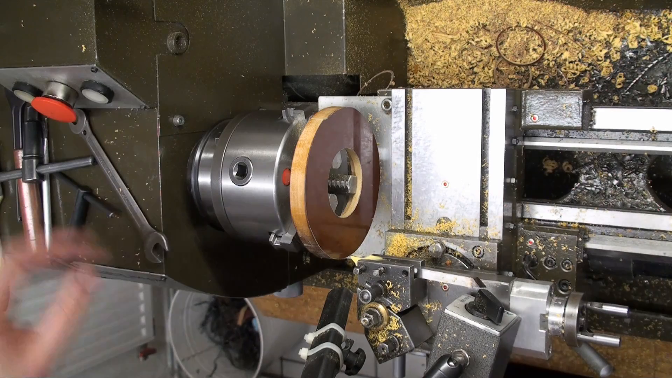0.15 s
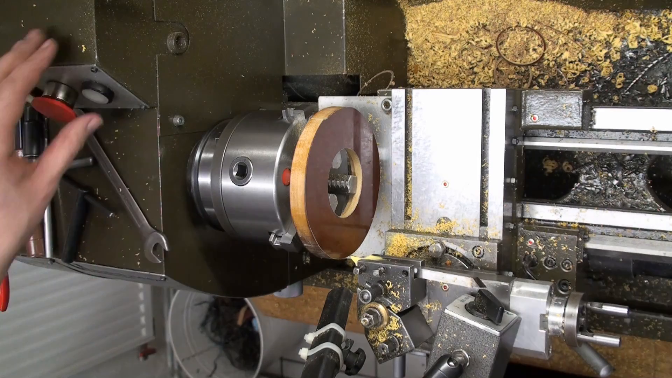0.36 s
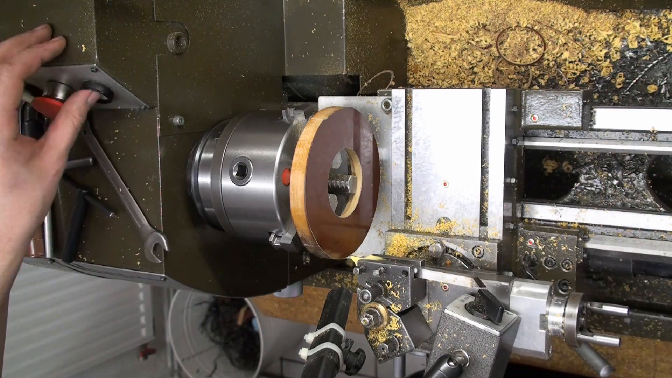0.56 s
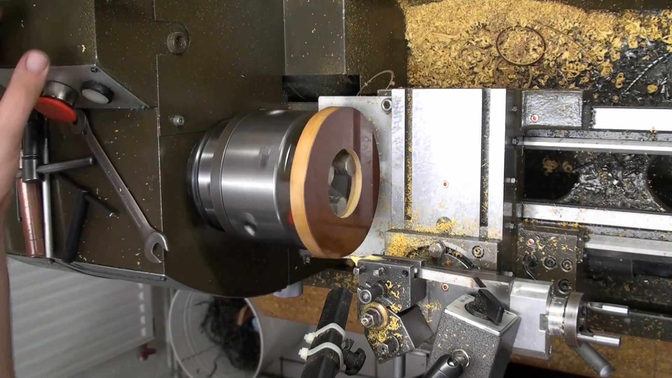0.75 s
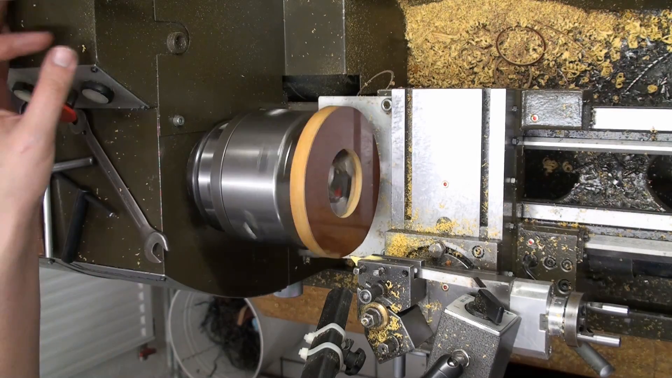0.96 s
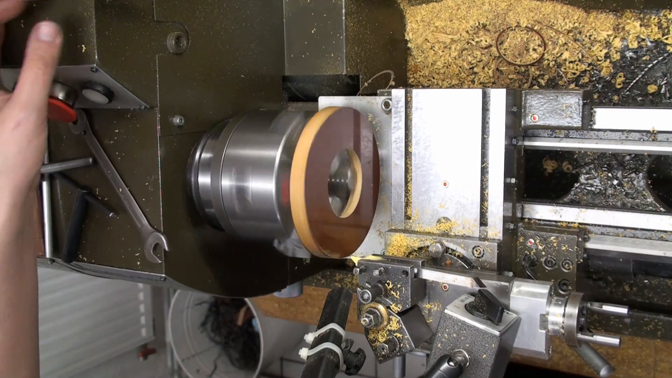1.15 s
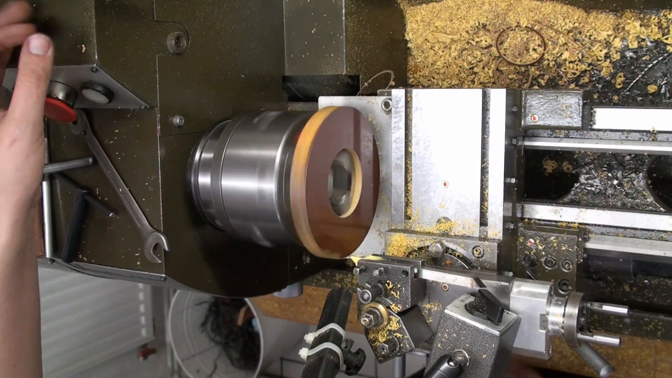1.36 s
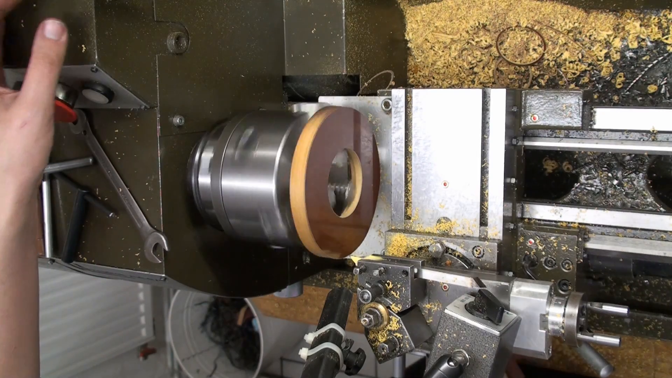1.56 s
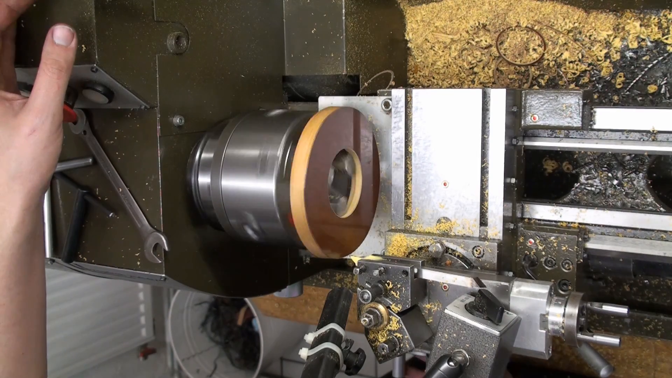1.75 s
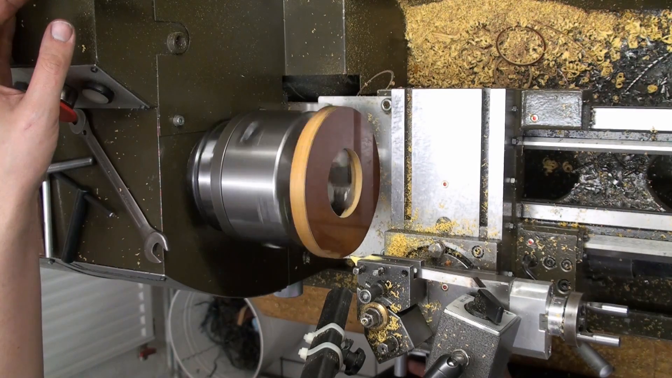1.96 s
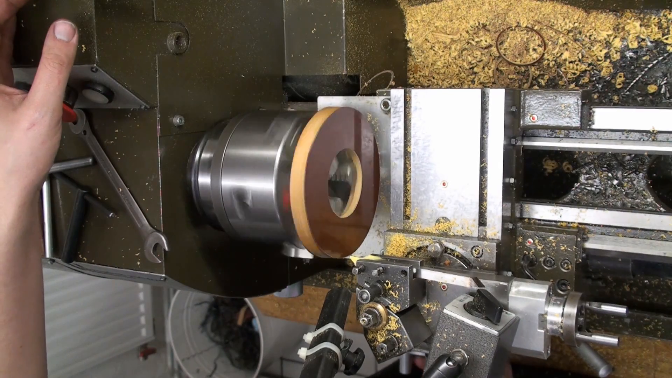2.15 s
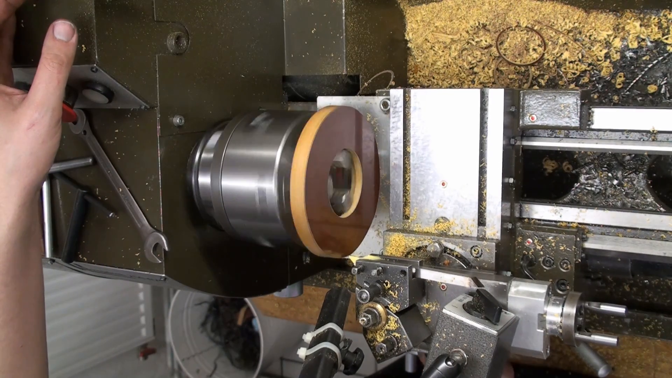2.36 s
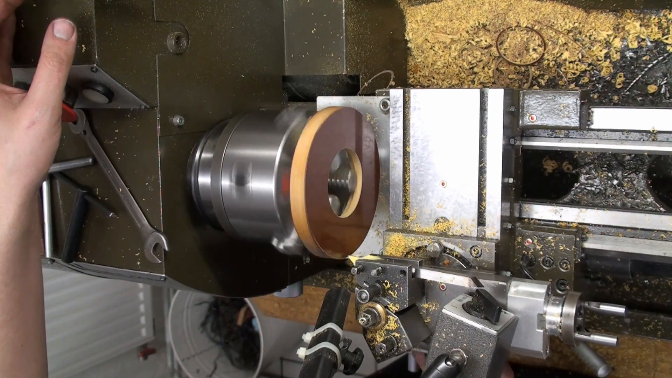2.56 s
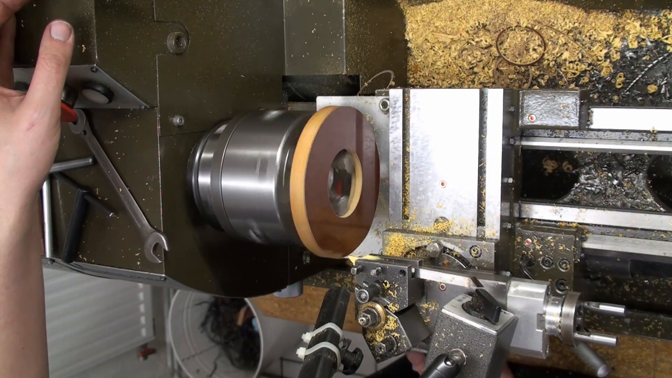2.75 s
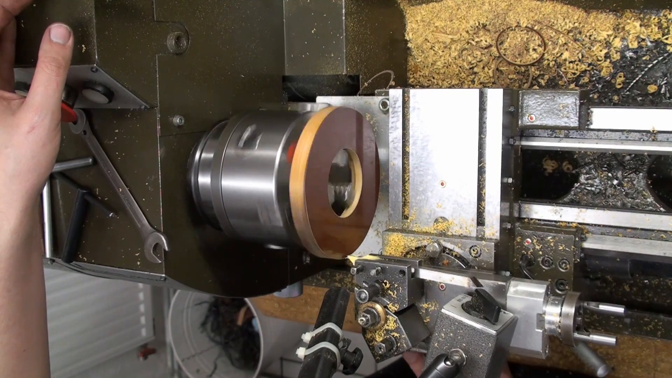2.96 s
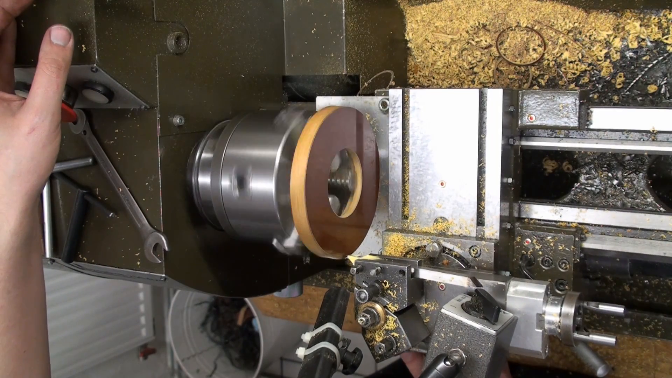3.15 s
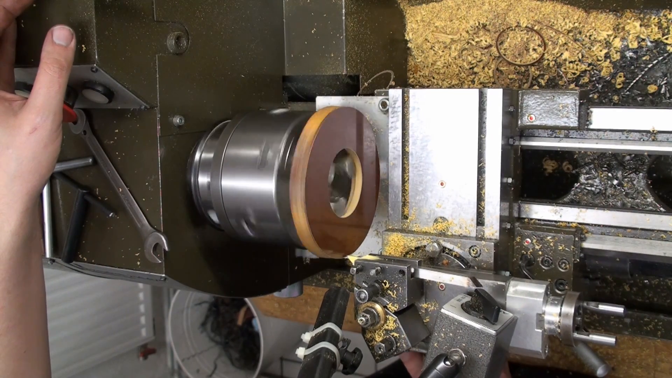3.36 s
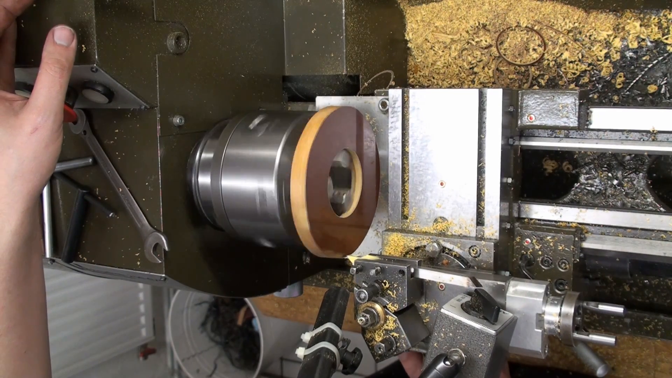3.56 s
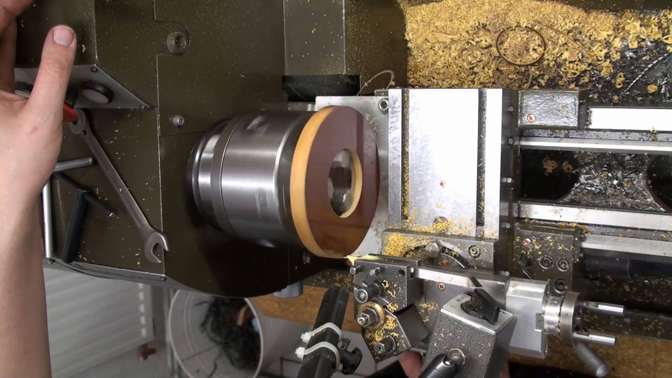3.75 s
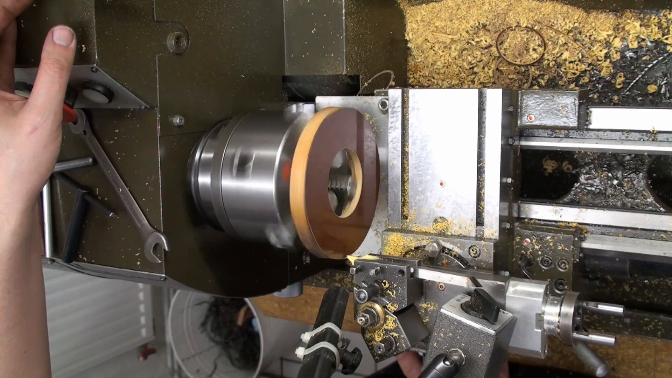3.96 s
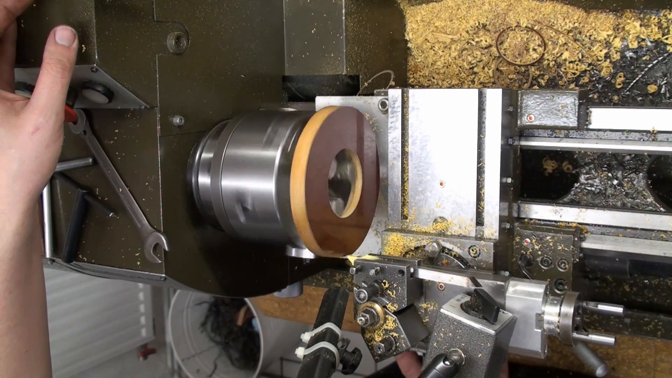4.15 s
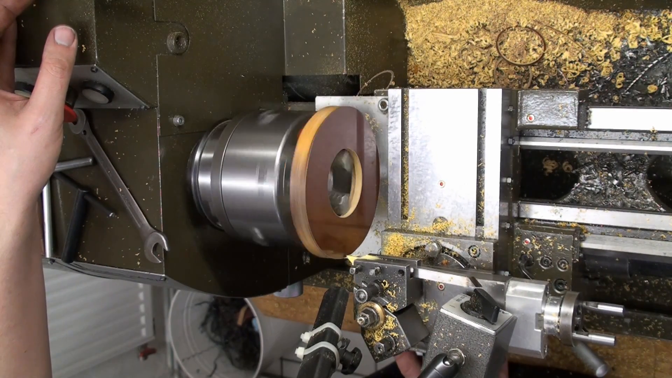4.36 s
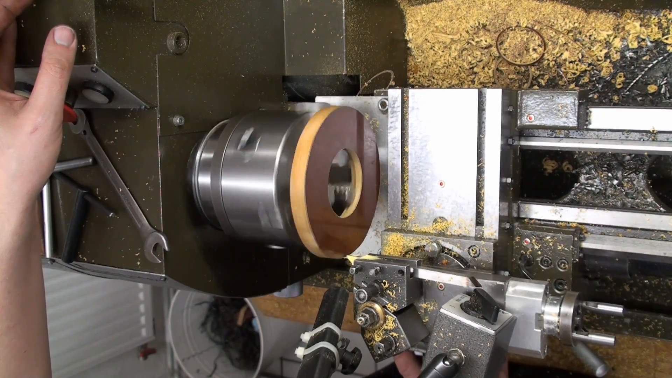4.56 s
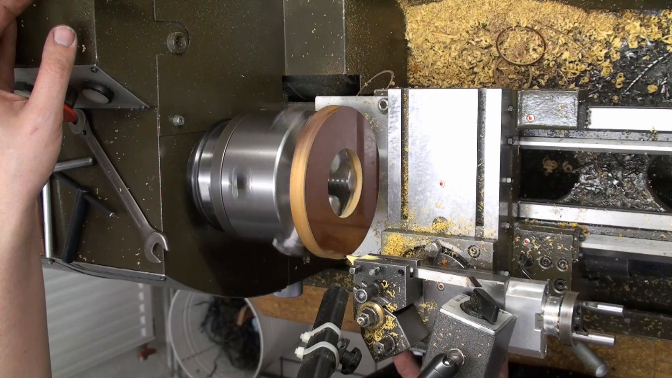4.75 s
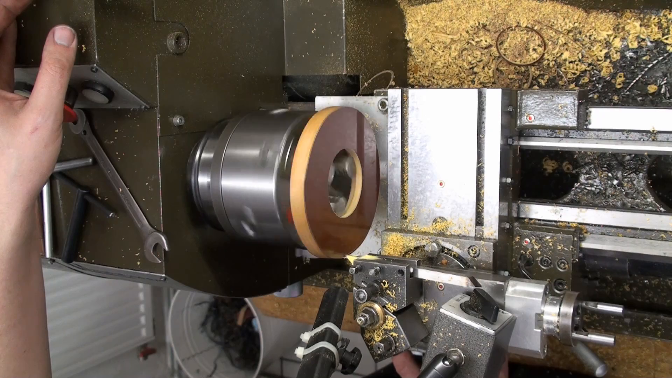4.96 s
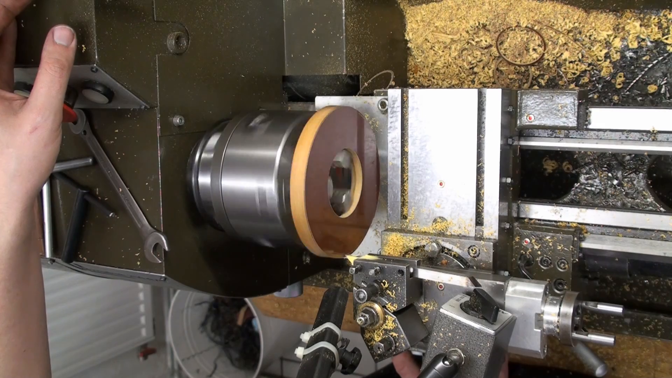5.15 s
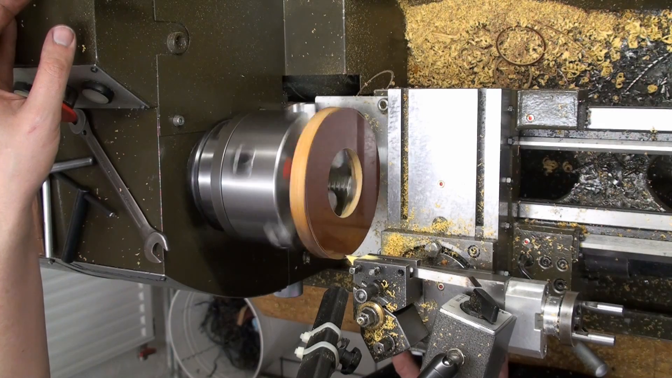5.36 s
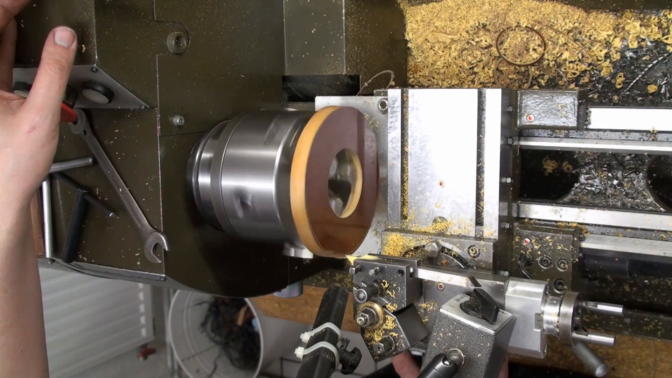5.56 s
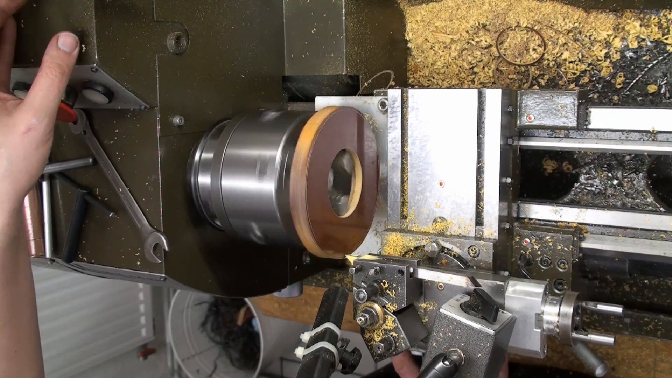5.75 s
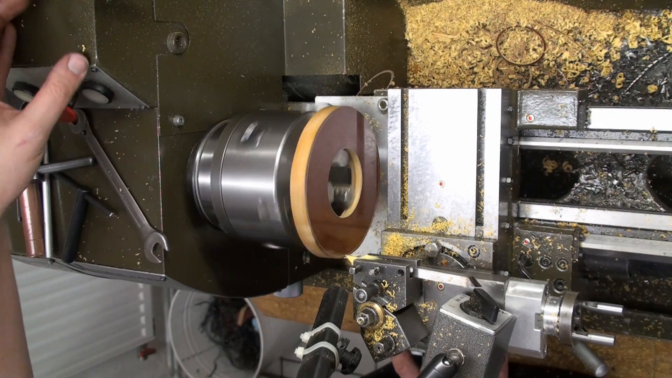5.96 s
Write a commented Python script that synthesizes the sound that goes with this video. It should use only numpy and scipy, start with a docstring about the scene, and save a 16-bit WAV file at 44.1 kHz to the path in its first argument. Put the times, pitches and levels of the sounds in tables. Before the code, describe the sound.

A small metal lathe clacks on, whines up with a knock and clinking steel, settles into a rumble, then a tool makes four harsh scrapes.

```python
"""An inverter-driven metal lathe, heard from just above the chuck in a small workshop.
At first a fan blows, as coloured noise, under faint steady tones, and the controls and gear train clack.
The drive comes on at 0.64 s and whines; the spindle overshoots with a knock, as noise rings the gears,
loose steel clinks, and all settles to a slow rumble of noise through the casting, with a deep drone.
From 5 s a tool bites a phenolic blank in four scrapes: brittle chips snap off and ring tool and post."""
import sys
import numpy as np
from scipy import signal
from scipy.fft import rfft, irfft, next_fast_len
from scipy.io import wavfile
from scipy.ndimage import uniform_filter1d

SR = 44100
rng = np.random.default_rng(int(sys.argv[2]) if len(sys.argv) > 2 else 0)


def store_wav(level_fs):
    """Save 16-bit WAV to argv[1]."""
    pcm = np.round(np.clip(np.atleast_2d(level_fs), -1, 1) * 32767)
    wavfile.write(sys.argv[1], SR, pcm.T.astype(np.int16))


N = 268613
TIME = np.arange(N) / SR
TOP_HZ = 15600
DRIVE_ON_S = 0.64

# How fast the motor's magnetic field rotates. Each row: time in seconds, field rate in Hz.
FIELD_SPEED = [(0.6, 2), (0.85, 6), (1.0, 9), (1.1, 11), (1.25, 15), (1.45, 16.5), (1.65, 14), (1.8, 11.7),
               (1.95, 10.6), (2.2, 10.1)]
# Pushes of the tool into the blank. Each row: start in seconds, end in seconds, bite time in seconds,
# drive of the edge in dB, drive of the tool post in dB, graze afterwards in dB relative to the edge.
SCRAPES = [(4.993, 5.088, 0.019, -20, -32.5, -5), (5.174, 5.269, 0.018, -18, -31, -11),
           (5.425, 5.773, 0.015, -19.5, -32.5, -8.5), (5.877, 6.058, 0.011, -21, -30.5, -10)]


def undb(db):
    """Decibels to gain."""
    return 10 ** (np.asarray(db) / 20)


def unit(x):
    """Scale to rms 1."""
    return x / np.sqrt(np.mean(x ** 2))


def curve(rows):
    """Points of (s, value), joined by straight lines in time."""
    rows = np.asarray(rows, float)
    return np.interp(TIME, rows[:, 0], rows[:, 1])


def noise():
    """White noise."""
    return rng.standard_normal(N)


def walk(rate):
    """Smooth random drift with rms 1, heading for a new value rate times a second."""
    hold = max(int(SR / rate), 1)
    steps = np.repeat(rng.standard_normal(N // hold + 1), hold)
    return unit(uniform_filter1d(steps, hold)[:N])


def envelope(start, end, attack_s, release_db_per_s):
    """Rise from start towards 1, then fade from end on."""
    rise = 1 - np.exp(-np.maximum(TIME - start, 0) / attack_s)
    return rise * undb(-release_db_per_s * np.maximum(TIME - end, 0))


def shaped(x, response):
    """Pass x through a response given as a function of frequency."""
    size = next_fast_len(N + SR // 2, True)
    hz = np.maximum(np.arange(size // 2 + 1) * SR / size, 1)
    return irfft(rfft(x, size) * response(hz), size)[..., :N]


def colour(x, points):
    """Give x a smooth spectrum of (Hz, dB) points; rms 1."""
    at, db = np.transpose(points)
    return unit(shaped(x, lambda hz: undb(np.interp(np.log(hz), np.log(at), db))))


def ring(x, modes):
    """Let x drive damped (Hz, width, dB) modes, neighbours swinging in opposite senses; rms 1."""
    def response(hz):
        total = 0
        for k, (f, width, db) in enumerate(modes):
            resonance = 1 / (1 + 1j * (hz * hz - f * f) / (hz * width))
            total = total + (-1) ** k * undb(db) * resonance
        return total

    return unit(shaped(x, response))


def workshop(x, t60, wet_db, column):
    """Near walls answer with a short noise tail, whose width between left and right varies with pitch."""
    # Stereo width of the room. Each row: frequency in Hz, side gain in dB for the machine,
    # side gain in dB for the cut.
    spread = np.transpose([(60, -28, -22), (250, -22, -12), (714, -11.5, -12.5), (1560, -7.5, -16),
                           (3040, -9.5, -16), (6940, -15, -16), (8000, -10, -11), (10500, -2, -8),
                           (11300, -3, -9), (12000, -31, -43)])
    age = TIME[:SR // 2]
    # the first reflection needs 3 ms
    tails = rng.standard_normal((2, len(age))) * np.exp(-np.log(1000) * age / t60) * (age > .003)
    tails /= np.sqrt(np.sum(tails ** 2, axis=1, keepdims=True))
    mid, side = (signal.fftconvolve(x, tail)[:N] for tail in tails)
    side = shaped(side, lambda hz: undb(np.interp(np.log(hz), np.log(spread[0]), spread[column])))
    return x + undb(wet_db) * mid + side * np.array([[1], [-1]])


def air_and_tones(air_db=-49, flutter_db=-2.0, waver_db=3.3):
    """Rushing fan air is fluttering noise; over it lie faint sines that waver in level and phase."""
    # Faint steady tones, low hums and two high whistles.
    # Each row: frequency in Hz, level in dB rms before it wavers.
    steady_tones = [(91.5, -60), (242.2, -49), (424, -57), (549.1, -62), (1933, -67.5), (2417, -68.5)]
    # Spectrum of the air. Each row: frequency in Hz, relative density in dB per Hz.
    air_spectrum = [(20, -24), (60, -14), (110, -6), (150, -10), (240, -5.5), (300, -6), (440, -18),
                    (520, -1.5), (720, -1), (950, -12.5), (2000, -18.5), (3000, -21.5), (7000, -25),
                    (10000, -33.5), (15000, -40)]
    tones = 0
    for hz, db in steady_tones:
        tone = unit(np.sin(2 * np.pi * hz * TIME + 0.34 * walk(2.96)))
        tones = tones + undb(db + waver_db * walk(7.8)) * tone
    return tones + undb(air_db + flutter_db * walk(23)) * colour(noise(), air_spectrum)


def tool_load(lag_s=0.077):
    """Load on the spindle, 0-1: the scrapes, smoothed by its inertia."""
    pushing = sum(1. * (TIME >= start) * (TIME < end) for start, end, *_ in SCRAPES)
    keep = np.exp(-1 / (lag_s * SR))
    return signal.lfilter([1 - keep], [1, -keep], pushing)


def churning():
    """The overshoot sets the gear train churning, and it calms slowly; strength 0-1."""
    return envelope(1.11, 1.17, attack_s=0.1, release_db_per_s=12.6)


def whine(turns, load, skirt_width=4.7, wobble=1.0, rough=0.12, sizzle_db=-59, gate_db=5, size=2048):
    """Windings sing at multiples of the switching rate; the pulse widths repeat each turn of the field."""
    # Lines at 1, 2, 3 and 4 times the switching rate. Each row: relative level in dB, buzzing skirt in dB,
    # gain in dB per doubling of field rate, gain in dB during the run-up, throb once a turn in dB,
    # throb twice a turn in dB.
    whine_lines = [(-62.5, -5, 5.5, 4.5, 0.5, -0.5), (-49, -4, -1, 1.5, 1, -0.5), (-68, 4, 0, 3, 1, -3),
                   (-51.5, -18, -3.5, -3, 0, 5.5)]
    # Sizzle of the switching edges. Each row: frequency in Hz, relative density in dB per Hz.
    sizzle_spectrum = [(4000, -33), (6000, 2), (7300, 0.5), (8500, -6), (10800, -16), (11800, -1),
                       (12900, 9), (13600, 14), (14200, -38)]
    switching_hz, current_rise_s = 3333.5, 0.056
    whine_db, load_db = 1.5, -21

    angle = 2 * np.pi * turns
    doublings = np.log2(curve(FIELD_SPEED) / FIELD_SPEED[-1][1])
    # the motor pulls hard during the run-up
    run_up = envelope(0.59, 1.2, attack_s=0.1, release_db_per_s=33)
    skirt = (1 + (np.fft.fftfreq(size, 1 / size) / skirt_width) ** 2) ** -.7
    # the switching edges bunch up four times a turn
    edges = noise() * undb(gate_db * np.cos(4 * angle))
    out = undb(sizzle_db) * colour(edges, sizzle_spectrum)
    for k, (db, skirt_db, speed_db, run_up_db, once_db, twice_db) in enumerate(whine_lines):
        # a wide comb of sidebands, spaced by the field rate, buzzes around each line
        cycle = np.fft.ifft(skirt * np.exp(2j * np.pi * rng.random(size)))
        buzz = np.interp(turns % 1 * size, np.arange(size), cycle / np.std(cycle))
        swing = np.exp(1j * wobble * np.sin(angle)) + undb(skirt_db) * buzz
        throb = undb(once_db * np.cos(angle) + twice_db * np.cos(2 * angle))
        throb = throb * (1 + rough * walk(150))
        line = np.real(swing * np.exp(2j * np.pi * (k + 1) * switching_hz * TIME))
        out = out + undb(db + speed_db * doublings + run_up_db * run_up) * unit(throb * line)
    current = 1 - np.exp(-np.maximum(TIME - DRIVE_ON_S, 0) / current_rise_s)
    # the whine sinks while the tool cuts
    return out * current * undb(whine_db + load_db * load)


def headstock(turns, load, throb_db=1.0, grit_db=-1.0, flutter_db=-2.0, surge_db=0.57):
    """Gears and belt shake casting and stand as noise, under a gritty hiss; rumble and hiss grow with speed."""
    # Resonances of the casting. Each row: frequency in Hz, width in Hz, relative level in dB.
    casting_modes = [(113.2, 6.6, -2.5), (183.5, 63, -11), (260.3, 19.6, 2.5), (277.9, 11.3, 2),
                     (312, 90, -10), (499, 83, -9), (660, 284, -12.5)]
    # Growls of the motor, driving the spindle up and braking it back.
    # Each row: start in seconds, end in seconds, level in dB.
    growl_times = [(1.21, 1.283, -41), (1.447, 1.56, -42), (1.677, 1.89, -46.5)]
    # Deep drone of the stand. Each row: time in seconds, level in dB.
    drone_level = [(0, -66), (1.7, -64), (3.2, -55.5), (4.55, -50), (4.75, -57), (6.09, -53)]
    # Resonances of the stand. Each row: frequency in Hz, width in Hz, relative level in dB.
    stand_modes = [(37, 3, -17), (64, 1.3, 3)]
    # Hiss of the running machine. # Each row: frequency in Hz, relative density in dB per Hz.
    hiss_spectrum = [(400, -8), (800, 3), (1100, 1), (1900, 1), (3000, -8), (5000, -8.5), (7500, -9.5),
                     (9000, -16), (11000, -17), (13600, -8), (14500, -46)]

    excess_hz = curve(FIELD_SPEED) - FIELD_SPEED[-1][1]
    # rumble and hiss swell in at 15 dB per second until the drive is on
    swell_db = -15 * np.maximum(DRIVE_ON_S - TIME, 0)

    shake = noise() * undb(throb_db * np.sin(4 * np.pi * turns))
    # the heavy casting passes neither the deepest bass nor treble
    passed = [(60, -32), (105, 2.5), (750, 3.5), (1100, -7.5), (3000, -19)]
    rumble = colour(ring(shake, casting_modes), passed)
    # braking loads the gears: deceleration of the field in Hz per second
    braking = uniform_filter1d(np.maximum(-np.gradient(excess_hz) * SR, 0), SR // 10)
    rumble_db = -43.5 + 0.63 * excess_hz + 0.1453 * braking + 3 * load + swell_db

    # torque strains the casting's lowest mode
    growl = ring(ring(noise(), casting_modes[:1]), [(113, 37, 0)])
    strain = 0
    for start, end, db in growl_times:
        strain = strain + undb(db) * envelope(start, end, attack_s=0.036, release_db_per_s=152)

    drone = colour(ring(noise(), stand_modes), [(20, -12), (35, -4), (68, -2), (100, -15)])
    # part of the drone reaches the casting's lowest mode
    coupled = drone + undb(-1.5) * growl
    bass = strain * growl + undb(curve(drone_level)) * coupled

    grain_db = grit_db * walk(500) + flutter_db * walk(17) + surge_db * walk(4.96)
    hiss = colour(noise() * undb(grain_db), hiss_spectrum)
    running = undb(-50.5 + 0.33 * excess_hz + swell_db)
    hiss_level = np.hypot(running, undb(-42) * churning())
    return bass + undb(rumble_db) * rumble + hiss_level * hiss


def chatter(ticks_per_s=45., spread_db=2.5, t60=0.058, running_db=-65, churning_db=-54):
    """Gear teeth tick at random as noise bursts once the drive is on, harder while the train churns."""
    # Resonances of light chatter in the gear train.
    # Each row: frequency in Hz, width in Hz, relative level in dB.
    chatter_modes = [(1880, 1050, 0), (3800, 290, -5.5), (4940, 490, -4.5)]
    age = TIME[:SR // 5]
    out = 0
    for hz, width, db in chatter_modes:
        ticks = rng.random(N) < ticks_per_s / len(chatter_modes) / SR
        ticks = ticks * undb(spread_db * np.clip(noise(), -2, 2))
        energy = signal.fftconvolve(ticks ** 2, np.exp(-2 * np.log(1000) * age / t60))[:N]
        out = out + undb(db) * ring(noise() * np.sqrt(np.abs(energy)), [(hz, width, 0)])
    return out * (undb(running_db) * (TIME > DRIVE_ON_S) + undb(churning_db) * churning())


def blow(start, db, modes, top_hz, t60, tail_db, tail_t60):
    """A short rattling contact and its after-shake ring modes up to top_hz; db is the loudest 5 ms."""
    age = np.maximum(TIME - start, 0)
    fade = undb(-60 * age / t60) + undb(tail_db - 60 * age / tail_t60)
    softness = signal.butter(6, min(top_hz, TOP_HZ), fs=SR, output="sos")
    sound = signal.sosfilt(softness, ring(noise() * fade * (TIME >= start), modes))
    loudest = np.sqrt(uniform_filter1d(sound ** 2, SR // 200).max())
    return undb(db) * sound / loudest


def rattles():
    """Fading noise rings clacks, the knock of gears taking up their slack, and clinks of loose steel."""
    # Clacks of the controls and gear train. Each row: start in seconds, dry level in dB,
    # centre in Hz, width in Hz, decay of the contact by 60 dB in seconds.
    clack_hits = [(0.587, -42, 4070, 7400, 0.1), (0.609, -43.5, 5460, 5500, 0.18),
                  (0.74, -37, 3850, 1360, 0.15), (0.743, -45, 860, 1190, 0.1),
                  (2.595, -42.5, 1900, 1710, 0.096), (2.937, -47.5, 1880, 500, 0.08),
                  (3.15, -49, 4900, 700, 0.11), (3.439, -49, 3550, 300, 0.042),
                  (3.919, -40, 9000, 6000, 0.05)]
    # Backlash knock and its rebound. Each row: start in seconds, dry level in dB.
    knock_hits = [(1.337, -23.5), (1.365, -42), (1.408, -42)]
    # Resonances of the knocked gears. Each row: frequency in Hz, width in Hz, relative level in dB.
    gear_modes = [(264, 14, 6.5), (336, 26, -4), (523, 39, 4.5), (805, 280, -9), (1210, 180, -5.5),
                  (2170, 600, -16), (3400, 440, -23.5), (4750, 320, -17.5)]
    # Clinks of loose steel. Each row: start in seconds, dry level in dB.
    clink_hits = [(1.867, -30.5), (1.911, -39.5), (2.029, -41.5)]
    # Resonances of the loose steel. Each row: frequency in Hz, width in Hz, relative level in dB.
    steel_modes = [(3727, 120, 3.5), (4310, 180, 8), (7500, 910, -4), (8500, 390, 1), (9140, 340, -1),
                   (11500, 420, 0.5)]
    out = 0
    for start, db, hz, width, t60 in clack_hits:
        out = out + blow(start, db, [(hz, width, 0)], hz + width, t60, tail_db=-24, tail_t60=0.87)
    for start, db in knock_hits:
        out = out + blow(start, db, gear_modes, top_hz=5600, t60=0.05, tail_db=-11.0, tail_t60=0.7)
    for start, db in clink_hits:
        out = out + blow(start, db, steel_modes, top_hz=12600, t60=0.067, tail_db=-17.0, tail_t60=0.36)
    return out


def pressure():
    """Drive of cutting edge and tool post; the chip grows in both depth and width as the edge bites."""
    # The edge catches and jolts the post. Each row: start in seconds, drive of the post in dB.
    catches = [(5.525, -29), (5.668, -27.5)]
    edge, post = 0, 0
    for start, end, bite_s, edge_db, post_db, graze_db in SCRAPES:
        depth = envelope(start, end, bite_s, release_db_per_s=0)
        # the edge backs out quickly; the heavier post follows more slowly
        push = envelope(start, end, bite_s, release_db_per_s=229)
        # between pushes the edge still grazes the blank, ever more lightly
        graze = undb(graze_db) * envelope(start, end, bite_s, release_db_per_s=97)
        edge = np.hypot(edge, undb(edge_db) * depth * np.maximum(push, graze))
        post_push = envelope(start, end, attack_s=0.045, release_db_per_s=100)
        post = np.maximum(post, undb(post_db) * post_push)
    for start, db in catches:
        jolt = envelope(start, start + 0.015, attack_s=0.0075, release_db_per_s=150)
        post = np.maximum(post, undb(db) * jolt)
    return edge, post


def cut(snaps_per_s=4000., spread_db=2.0, judder_db=0.14, rub=0.64, tool_db=-3.0, chips_db=-6,
        wander_db=1.0, uneven_db=0.52, shudder_db=1.4):
    """Chips snap off densely and unevenly; their force rings tool and post and is also heard directly."""
    # Resonances of the tool post. Each row: frequency in Hz, width in Hz, relative level in dB.
    post_modes = [(715, 89, -9.5), (1100, 36, 4.5), (1140, 79, 0), (1300, 125, -7.5)]
    # Resonances of the tool. Each row: frequency in Hz, width in Hz, relative level in dB.
    tool_modes = [(1657, 96, -3.5), (2220, 83, -10), (2370, 180, -7), (4020, 67, 2), (4082, 70, 5),
                  (4194, 104, 0.5), (4600, 73, -21), (5160, 180, -7), (6150, 130, -0.5), (7040, 68, -21),
                  (7135, 79, 6), (7150, 130, -23), (10660, 100, -6), (11500, 400, -20), (13260, 380, -13)]
    # Crackle of the chips themselves. Each row: frequency in Hz, relative density in dB per Hz.
    chip_spectrum = [(400, -22), (750, -13.5), (1500, 1), (2600, 8), (3200, -9.5), (4200, -8), (5600, 4),
                     (7400, 9), (8300, -6), (9200, -5), (10400, 5), (12300, 0), (13800, 3), (15000, -33)]

    sizes = undb(spread_db * np.minimum(rng.exponential(size=N), 3))
    snaps = (rng.random(N) < snaps_per_s / SR) * np.sign(noise()) * sizes
    force = (unit(snaps) + rub * noise()) * undb(judder_db * walk(260))
    # random signs free the crackle from the phase of the ringing
    crackle = colour(force * np.sign(noise()), chip_spectrum)

    # the point of contact wanders along the edge, favouring now one set of modes, now another
    ringing = 0
    for k in range(3):
        modes = tool_modes[k::3]
        power = sum(width * undb(2 * db) for _, width, db in modes)
        ringing = ringing + np.sqrt(power) * ring(force * undb(wander_db * walk(40)), modes)
    edge = undb(tool_db) * unit(ringing) + undb(chips_db) * crackle
    post = colour(ring(force, post_modes), [(300, -37), (650, 4), (1400, -2.5), (3000, -13)])
    on_edge, on_post = pressure()
    return on_edge * undb(uneven_db * walk(46)) * edge + on_post * undb(shudder_db * walk(33)) * post


def scene():
    """The running machine surrounds the listener and its knocks echo; the cut is right underneath."""
    turns = np.cumsum(curve(FIELD_SPEED)) / SR
    load = tool_load()
    steady = air_and_tones() + whine(turns, load) + headstock(turns, load)
    return (workshop(steady, t60=0.079, wet_db=-19, column=1)
            + workshop(chatter() + rattles(), t60=0.17, wet_db=-9, column=1)
            + workshop(cut(), t60=0.087, wet_db=-9, column=2))


def record(dry):
    """A steep low-pass cuts the top."""
    return signal.sosfilt(signal.ellip(8, .2, 70, TOP_HZ, fs=SR, output="sos"), dry)


dry = scene()
out = record(dry)
store_wav(out)
```